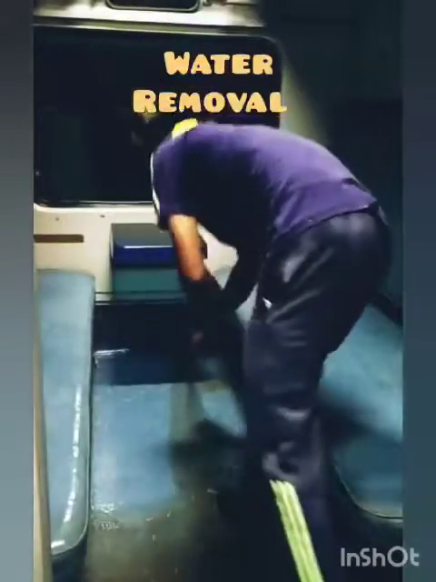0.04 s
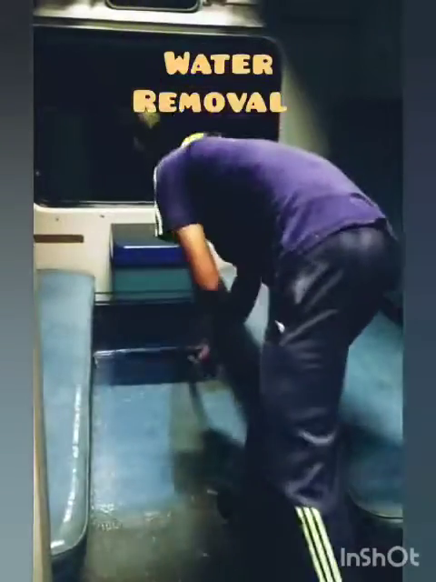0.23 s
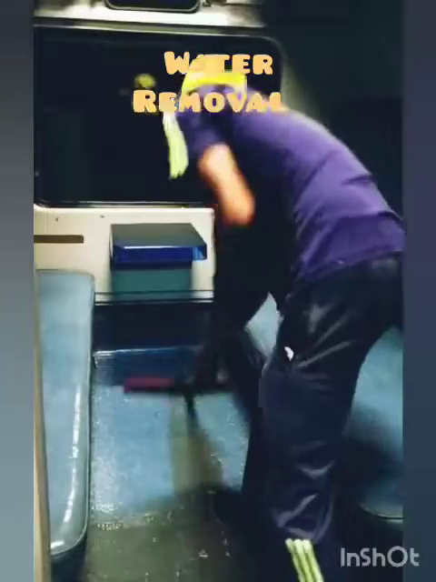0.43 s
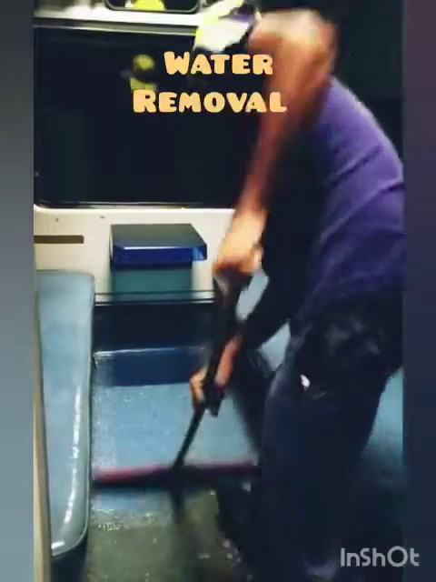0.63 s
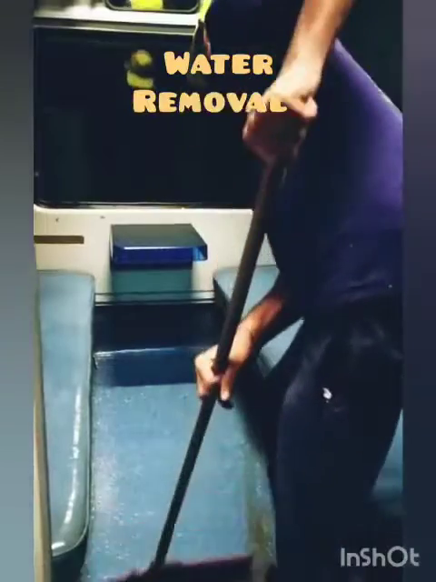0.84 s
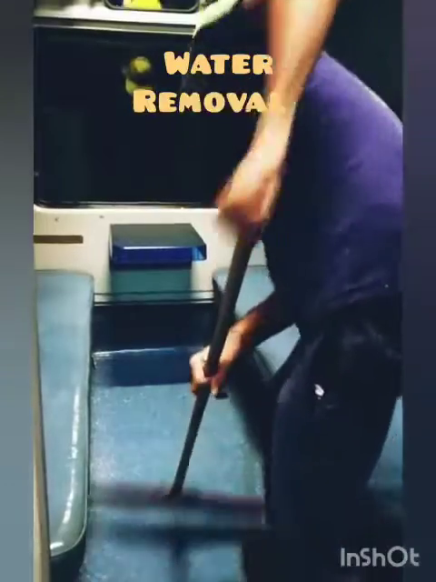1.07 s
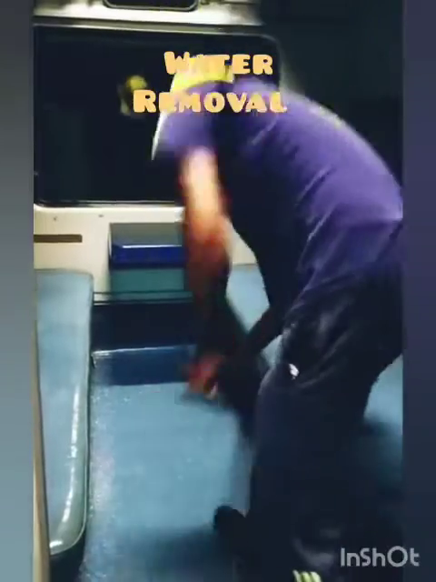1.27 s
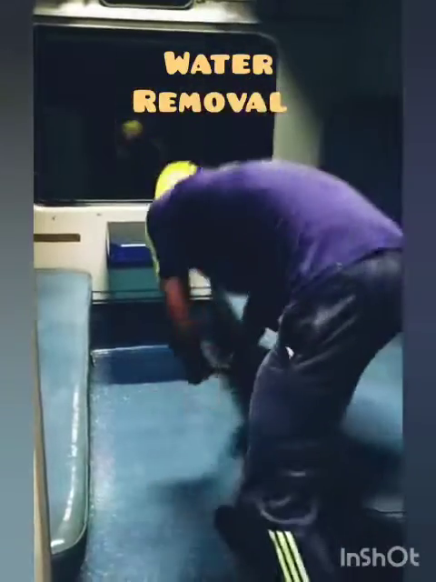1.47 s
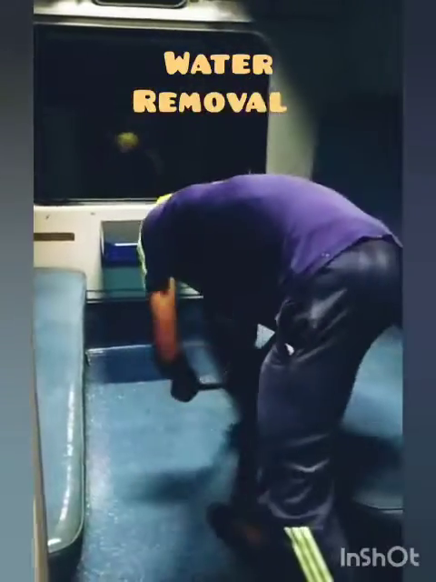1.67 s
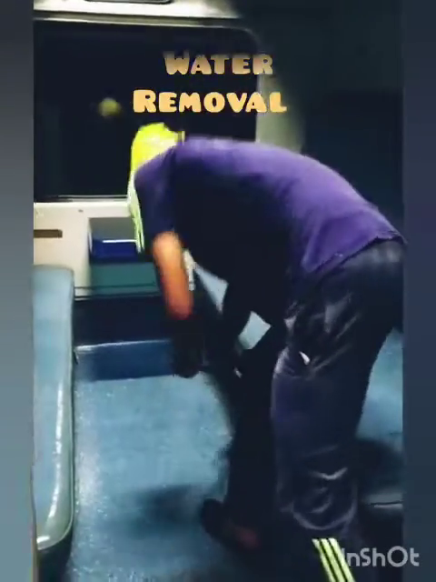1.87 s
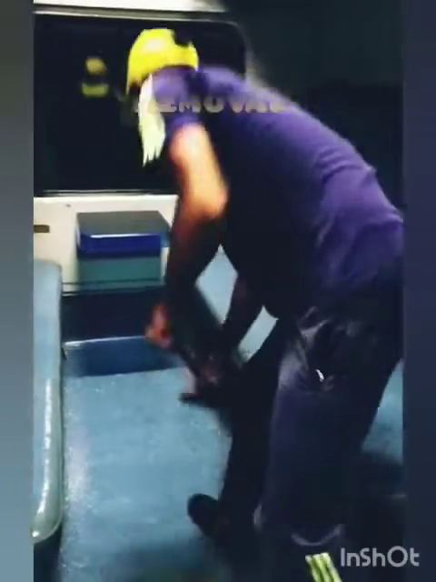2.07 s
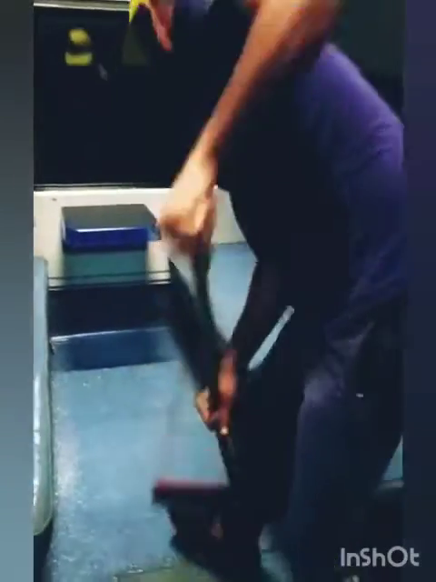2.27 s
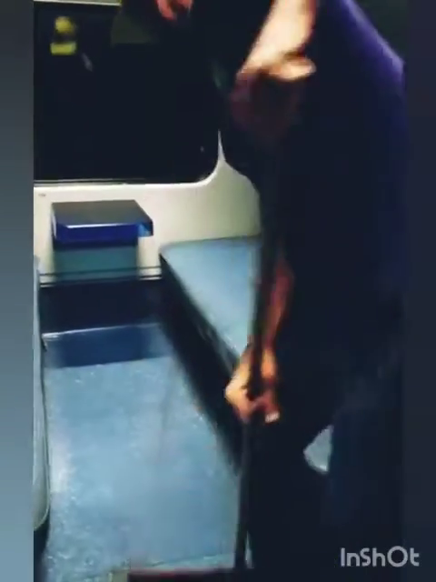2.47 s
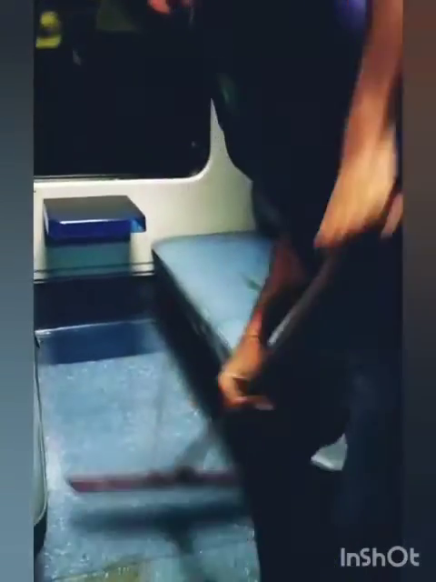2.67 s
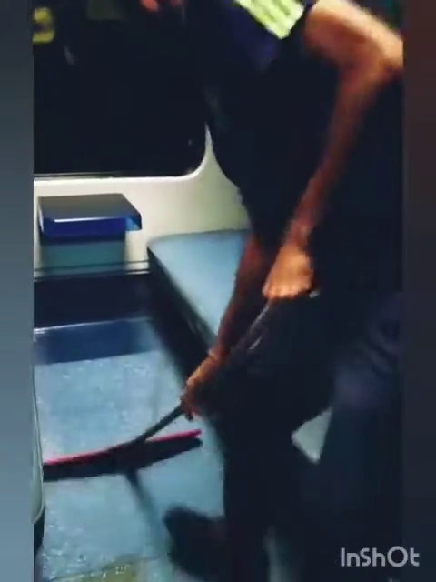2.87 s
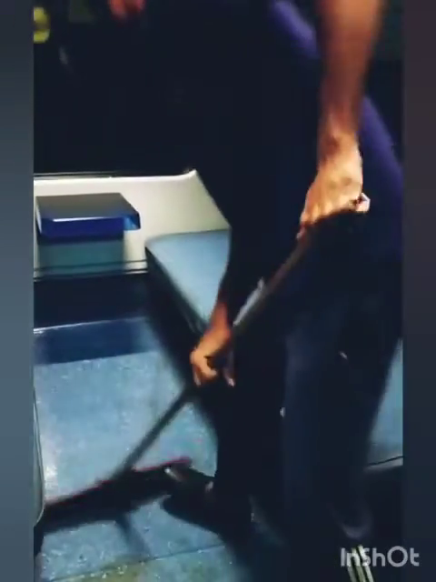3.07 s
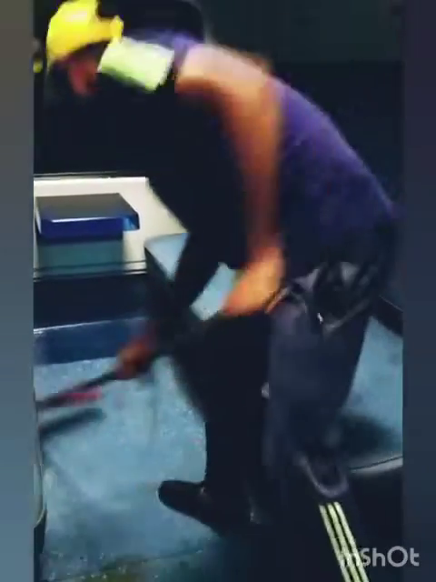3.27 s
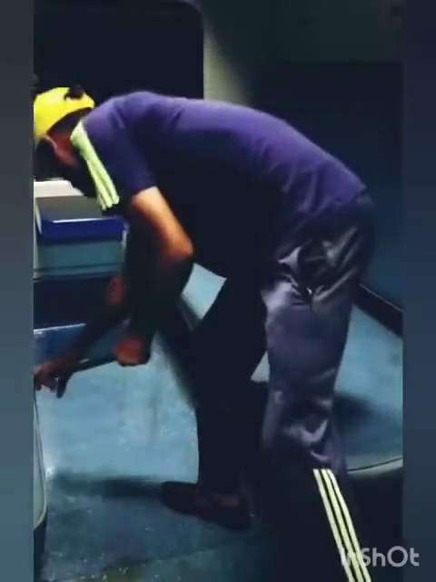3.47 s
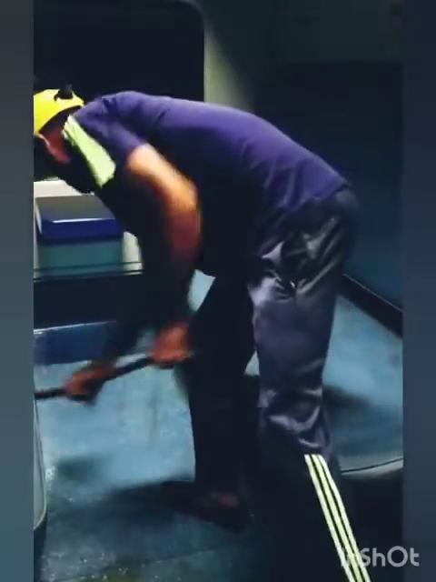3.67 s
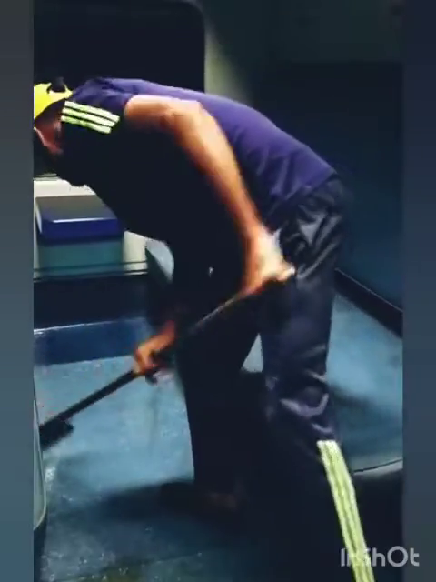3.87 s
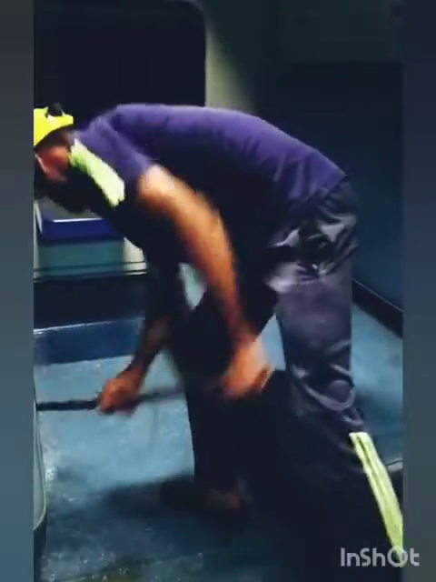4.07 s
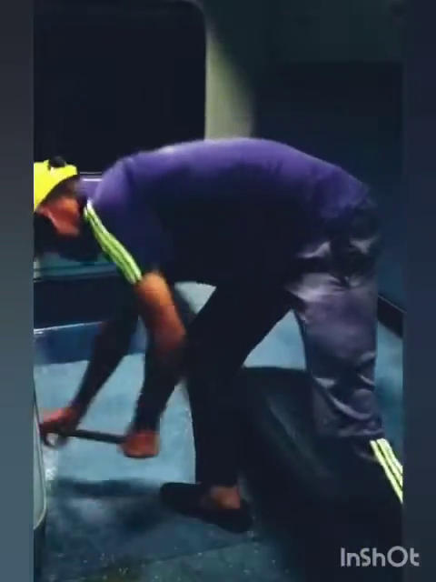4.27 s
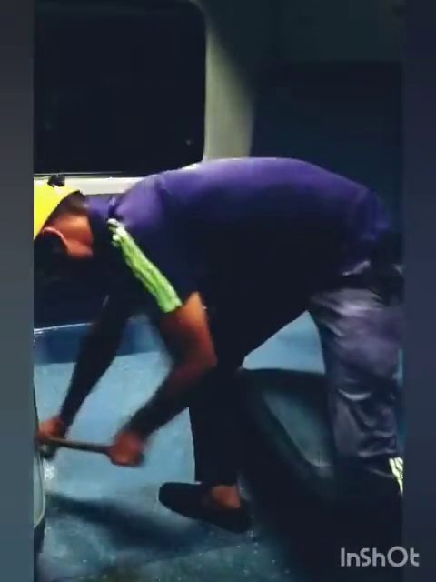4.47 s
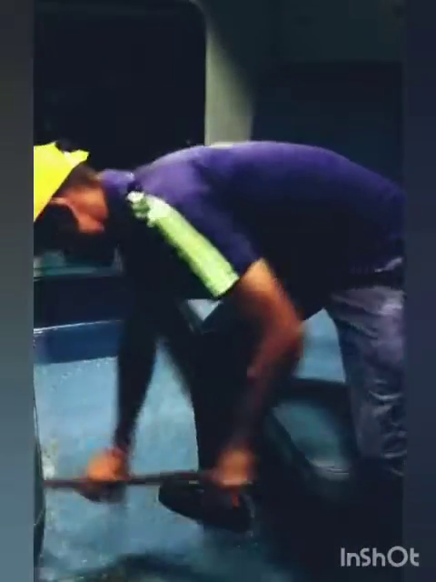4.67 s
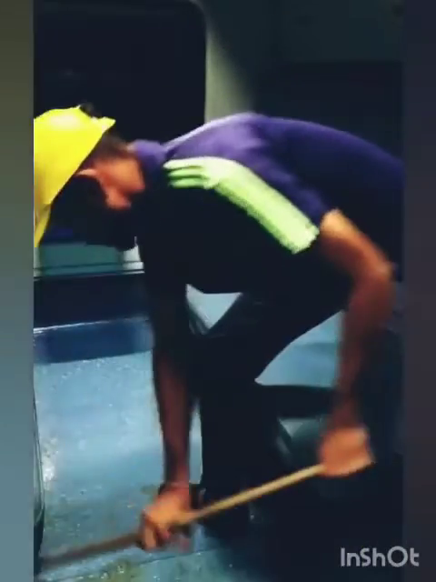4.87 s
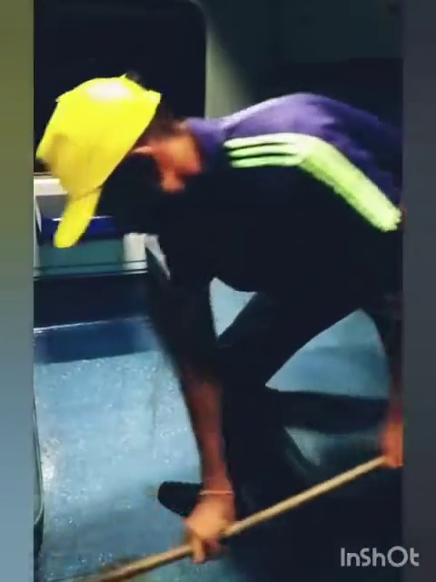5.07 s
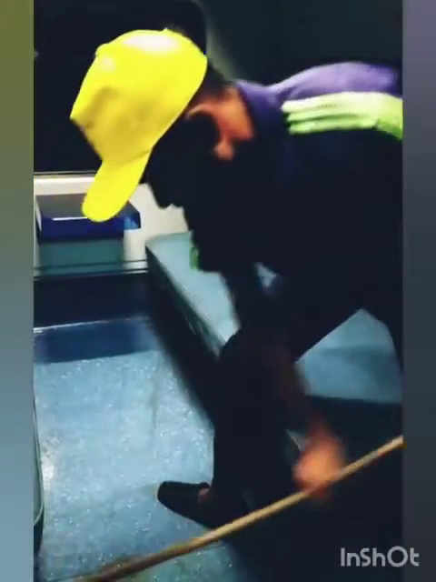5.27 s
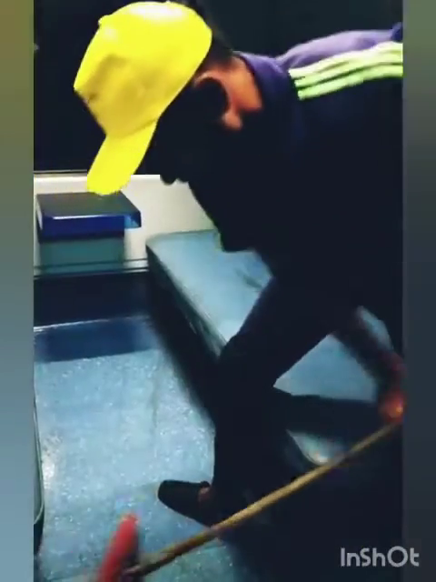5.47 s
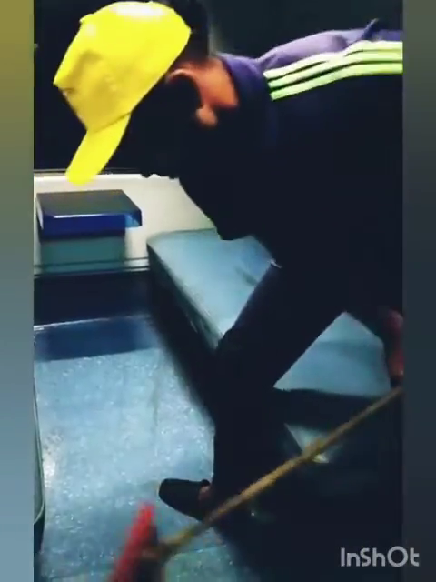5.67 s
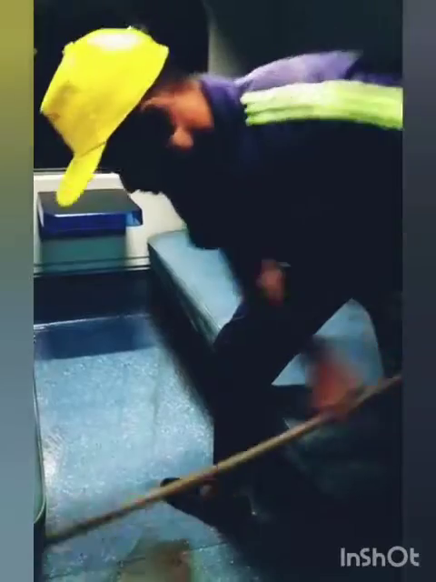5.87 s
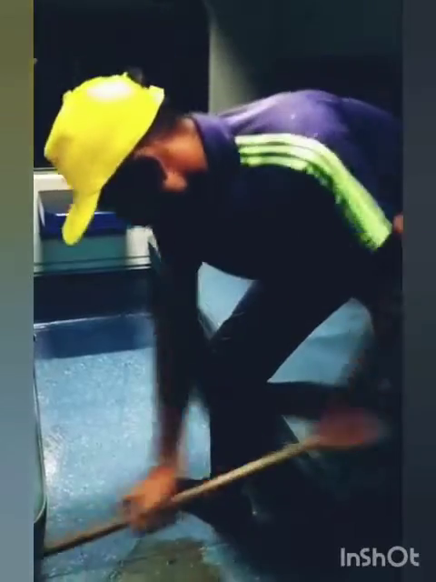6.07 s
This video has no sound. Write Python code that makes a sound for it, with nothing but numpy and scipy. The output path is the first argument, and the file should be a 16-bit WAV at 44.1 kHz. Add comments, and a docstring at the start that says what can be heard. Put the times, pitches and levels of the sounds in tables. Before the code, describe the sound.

Close, irregular wet scrubbing with stiff bristles: hard clacks, splashy landings, raspy drags and a short squeaky grab inside a small humming compartment.

```python
"""Broom on a wet coach floor

Close by, a long-handled broom is set down with a knock, a rattle and a splat, then dragged over the wet floor.
Countless random bristle slips hiss in the water film; filtered slips make the splats, judders and rattles.
Decaying modes make the knocks; one hard stroke drives narrow resonances into a squeal.
The compartment answers with a brief noise tail, over a low hum; the left microphone is shaded from the treble."""
import sys
import numpy as np
from scipy import signal
from scipy.fft import rfft, irfft
from scipy.io import wavfile
from scipy.ndimage import uniform_filter1d

SR = 44100
rng = np.random.default_rng(int(sys.argv[2]) if len(sys.argv) > 2 else 0)


def to_wav(sig):
    """Store sig (one row per channel, or 1-D mono) as 16-bit WAV at the path in sys.argv[1].

    Samples outside -1..1 are clipped; the rate is SR.
    """
    pcm = np.clip(np.atleast_2d(sig), -1, 1) * 32767
    pcm = np.round(pcm).astype(np.int16)
    wavfile.write(sys.argv[1], SR, pcm.T)  # frames by channels


N = 269451
TIME = np.arange(N) / SR

# the coach at rest, relative spectrum: [f/Hz, density/dB per Hz]
HUM_SPECTRUM = [(18, -60), (30, -33), (49, -30), (156, -13.5), (193, -2.5), (232, -0.5), (309, -9.5),
                (353, -19), (424, -7), (483, -8.5), (645, -13.5), (795, -19.5), (1600, -22), (6000, -20.5),
                (8500, -18), (13200, -21), (15800, -25)]
# broom pushes and pulls, levels before trim, rasp and fizz before their shares by pitch:
# [start t/s, length/s, attack/s, hiss level/dB, swell/dB per s, rasp level/dB, fizz level/dB]
STROKES = [(-0.1, 0.25, 0.044, -42.5, 17, -16, -33), (0.12, 0.41, 0.24, -31.5, -3, -1.5, -23),
           (0.531, 0.37, 0.13, -34, -6, 1, -6), (1.525, 0.075, 0.06, -32, 9, 8, -23),
           (1.74, 0.18, 0.071, -31.5, -0.5, -3.5, -26), (1.923, 0.13, 0.045, -34.5, 0, -5.5, -23),
           (2.014, 0.51, 0.05, -30, -14, 1, -16), (2.867, 0.28, 0.033, -39, -28, 5, -9),
           (3.206, 0.024, 0.017, -47.5, 1, 23, -12), (3.443, 0.34, 0.094, -30.5, -4, 4.5, -20),
           (4.383, 0.49, 0.23, -29, -3, -3.5, -23), (4.896, 0.063, 0.061, -33, 0, -5.5, 0),
           (4.976, 0.4, 0.22, -31.5, 7.5, 10.5, -21), (5.358, 0.13, 0.064, -29, 11, 3.5, -4)]
# bristles on the wet floor, relative spectrum: [f/Hz, density/dB per Hz]
HISS_SPECTRUM = [(71, -21), (120, -37), (150, -15), (240, -7), (301, -15.5), (640, -5.5), (802, -11),
                 (1000, -4.5), (1480, -2.5), (1900, -5.5), (2450, -3.5), (4400, -3.5), (5000, -5),
                 (5930, -2), (7200, -2), (9500, -1.5), (13600, -5.5), (15800, -11.5)]
# how far each pitch follows the rasp and the fizz: [f/Hz, share]
RASP_SHARE = [(200, 0.79), (900, 0.41), (3800, 0.53), (7000, 0.017)]
FIZZ_SHARE = [(7000, 0.006), (12000, 0.24)]
# the dragged head judders, level before trim, width of each of two filter passes:
# [start t/s, length/s, attack/s, f/Hz, width/Hz, level/dB]
JUDDERS = [(0.043, 0.018, 0.0096, 840, 450, -35), (0.492, 0.33, 0.036, 624, 332, -46.5),
           (0.872, 0.041, 0.01, 290, 253, -46), (2.01, 0.071, 0.037, 775, 450, -44),
           (2.167, 0.21, 0.03, 610, 416, -44), (2.376, 0.032, 0.008, 610, 248, -39.5),
           (3.452, 0.072, 0.036, 920, 1000, -32), (3.467, 0.046, 0.0086, 612, 110, -35.5),
           (4.703, 0.085, 0.018, 520, 221, -48.5), (4.974, 0.14, 0.026, 940, 400, -35),
           (4.99, 0.03, 0.004, 2260, 90, -35), (5.09, 0.2, 0.057, 510, 300, -45.5),
           (5.243, 0.062, 0.033, 243, 120, -43), (5.496, 0.041, 0.02, 990, 300, -34.5)]
# the judder stutters at random: (level points per s, depth/dB)
STUTTER = (38, 1.8)
# water slapped from under the head, levels before trim:
# [t/s, spray level/dB, slosh level/dB, rise/s, spray fade/s, spray's brightest f/Hz, left minus right level/dB]
SPLATS = [(0.0438, -21, -27, 0.0022, 0.015, 6400, -17), (0.058, -47, -24.5, 0.0033, 0.044, 3500, -18.5),
          (0.536, -21, -34, 0.0027, 0.013, 9000, -18), (1.198, -46.5, -51, 0.0058, 0.15, 3380, -21),
          (1.268, -23, -39.5, 0.0095, 0.04, 5800, -19), (1.464, -24, -35, 0.049, 0.023, 3800, -16),
          (1.497, -27.5, -23.5, 0.0014, 0.052, 6200, -10.5), (1.887, -25, -68, 0.0039, 0.017, 6960, -18),
          (2.843, -39, -30, 0.00044, 0.074, 6360, -21), (3.225, -24, -54, 0.0046, 0.027, 7700, -20),
          (3.405, -33.5, -43.5, 0.032, 0.058, 8700, -19), (3.463, -38, -30, 0.016, 0.062, 5160, -18),
          (4.242, -40, -46, 0.00074, 0.0045, 4000, -35), (4.266, -31, -20.5, 0.0059, 0.18, 6000, -19),
          (4.995, -19, -26, 0.0013, 0.12, 3130, -8), (5.464, -34, -35, 0.0013, 0.007, 2520, -5),
          (5.825, -32.5, -67, 0.017, 0.013, 10900, -17), (5.858, -40.5, -85, 0.0052, 0.012, 9550, -25)]
# the head or a foot meets the floor, knock and boom levels before trim:
# [t/s, knock level/dB, contact f/Hz, floor boom level/dB, rattle level/dB, left minus right level/dB]
KNOCKS = [(0.0585, -13, 740, -53, -38, -19), (0.0624, -4.5, 960, -31, -33, -19),
          (0.068, -12, 664, -24, -35, -6), (0.106, -32, 805, -48, -55, -19),
          (0.138, -22, 635, -34, -63, -15), (0.354, -23, 337, -23.5, -50, -14),
          (0.365, -18, 137, -39, -52, -10), (0.379, -27, 171, -43, -57, -6),
          (0.54, -30, 170, -43, -58, -13), (0.553, -23, 173, -49, -56, -13),
          (1.198, -23.5, 450, -26.5, -56, -16), (1.306, -23.5, 450, -25, -60, -12),
          (1.477, -23.5, 520, -35, -52, -14), (1.4997, -0.5, 1150, -13, -16.5, -10),
          (1.507, 1, 565, -10.5, -42, -6.5), (1.894, -25.5, 162, -40, -57, -10),
          (2.8463, 0, 715, -16.5, -18.5, -11), (2.8629, -9.5, 1100, -34, -32, -27),
          (2.8864, -8, 980, -43, -27, -15), (3.125, -15.5, 527, -19.5, -35.5, -16),
          (3.226, -19, 1210, -26.5, -52, -11), (3.469, -19.5, 910, -38, -35, -27),
          (3.477, -15, 610, -21, -38, -15), (4.246, -18, 450, -34, -62, -15),
          (4.2689, -2.5, 364, -23, -35, -13), (4.279, -8, 497, -21, -51, -11),
          (4.291, -12, 520, -20, -48, -6), (4.425, -25, 474, -38, -45, -15),
          (4.651, -23, 470, -45, -55, -12), (4.667, -23.5, 493, -38, -57, -12),
          (4.677, -25, 604, -47, -56, -16), (4.9963, 2, 490, -6.5, -20.5, -0.5),
          (5.021, -7.5, 1040, -28, -37, 14), (5.4643, -19, 1240, -30, -50, 1),
          (5.468, -8.5, 1270, -36, -48, -12), (5.487, -13, 850, -19.5, -42, -9),
          (5.508, -7.5, 990, -26, -46, -34), (5.520, -11.5, 457, -17, -39, -8.5)]
# struck broom head and handle, relative: [f/Hz, width/Hz, energy level/dB]
BROOM_MODES = [(460.3, 16, -9), (541, 57, -6.5), (639, 44, -6), (880, 93, -9), (1017, 38, -11),
               (1164, 120, -5), (1365, 59, -8), (2320, 66, -9)]
# hollow floor panel, relative: [f/Hz, width/Hz, energy level/dB]
PANEL_MODES = [(170, 22, -5), (226.4, 17, 7.5), (262, 83, 4)]
# the hard-pressed edge grabs the floor: [start t/s, length/s, attack/s, squeal level/dB, whistle level/dB]
GRABS = [(3.513, 0.03, 0.02, -28.5, -31), (3.56, 0.035, 0.022, -29.5, -33), (3.622, 0.028, 0.008, -23, -37),
         (3.665, 0.075, 0.015, -27.5, -35.5), (3.76, 0.045, 0.022, -30, -41)]
# resonances of the squealing edge: [f/Hz, width of each of two filter passes/Hz, relative level/dB]
SQUEAL_MODES = [(1480, 300, -12), (2720, 110, -10), (3780, 200, -18), (4482, 32, -11), (4620, 30, -12),
                (6400, 1000, -2), (6447, 35, -16), (6587, 55, -8.5), (7000, 700, -3), (7600, 1300, 1)]
# thin whistle on top of the squeal: [f/Hz, width of each of two filter passes/Hz, relative level/dB]
WHISTLE_MODES = [(12135, 130, -7), (12565, 70, -7)]
# reverberation of the compartment: [f/Hz, t60/s]
COACH_T60 = [(200, 0.28), (500, 0.27), (1200, 0.37), (4000, 0.57), (12000, 0.5)]
# share of a left-right level difference that each pitch gets: [f/Hz, share]
SHADE = [(200, 0.74), (600, 0.7), (1400, 0.64), (2800, 0.81), (5500, 0.94), (9000, 1.26), (14000, 0.93)]

# hiss, squeal and judder die away at these rates once the push, grab or spell ends
RELEASE_DB_PER_S, GRAB_RELEASE_DB_PER_S, JUDDER_RELEASE_DB_PER_S = 114.5, 253, 269
# a stroke wipes the water film thinner: the rasp fades and the fizz grows (before their shares by pitch)
RASP_DB_PER_S, FIZZ_DB_PER_S = -11.5, 39
# spreads of two random level changes of the hiss over pitch and time
RIPPLE_DB, GRAIN_DB = 2.0, 1.6
# under the spray the body of the water sloshes, lower and always alike
SLOSH_HZ, SLOSH_FADE_S = 1820, 0.051
RATTLE_RISE_S, RATTLE_FADE_S = 0.017, 0.024
TOP_HZ = 15900


def undb(db):
    """Turn dB into an amplitude factor."""
    return 10 ** (np.asarray(db) / 20)


def unit(x):
    """Scale to rms 1."""
    return x / np.sqrt(np.mean(x ** 2))


def at(points, hz):
    """Read (Hz, value) points on a log-frequency axis."""
    f, value = np.transpose(points)
    return np.interp(np.log(np.maximum(hz, 1)), np.log(f), value)


def colour(x, points):
    """Weight the spectrum of a sound by (Hz, dB) points."""
    f = np.fft.rfftfreq(x.shape[-1], 1 / SR)
    return irfft(rfft(x) * undb(at(points, f)), x.shape[-1])


def bands(x, count=17):
    """Yield (Hz, band) for overlapping half-octave bands that sum to the sound."""
    centres = np.geomspace(60, 15000, count)
    spectrum, f = rfft(x), np.fft.rfftfreq(x.shape[-1], 1 / SR)
    for hz, weights in zip(centres, np.eye(count)):
        share = at(np.c_[centres, weights], f)
        yield hz, irfft(spectrum * share, x.shape[-1])


def resonate(x, hz, width):
    """Two-pole resonance with gain 1 at its centre."""
    w = 2 * np.pi * min(hz, SR / 2.2) / SR
    a = np.sin(w) * width / hz / 2
    return signal.lfilter([a, 0, -a], [1 + a, -2 * np.cos(w), 1 - a], x)


def resonate_twice(x, hz, width):
    """Two equal resonances in a row, for steeper skirts, at rms 1."""
    once = resonate(x, hz, width)
    return unit(resonate(once, hz, width))


def ring(modes, t):
    """Sum struck modes; a wider mode dies sooner, and its dB is its energy."""
    total = 0
    for hz, width, db in modes:
        decay = np.exp(-np.pi * width * t)
        total = total + undb(db) * np.sqrt(width / SR) * decay * np.sin(2 * np.pi * hz * t)
    return total


def walk(rate):
    """Random level curve with a spread near 1, given its points per second."""
    points = rng.standard_normal(400)
    return np.interp(TIME * rate % 399, np.arange(400), points)


def patches(shape, size):
    """Smooth chance over pitch and time with a spread of 1."""
    over_pitch = uniform_filter1d(rng.standard_normal(shape), size[0], axis=-2)
    return unit(uniform_filter1d(over_pitch, size[1], axis=-1))


def pan(db):
    """Left and right gains of constant power for a left minus right level."""
    ratio = undb(np.atleast_1d(db))
    return np.array([ratio, np.ones_like(ratio)]) * 2 / np.sqrt(1 + ratio ** 2)


def place(x, side_db):
    """The left microphone is shaded more in the treble than in the bass."""
    f = np.fft.rfftfreq(x.shape[-1], 1 / SR)
    return irfft(rfft(x) * pan(side_db * at(SHADE, f)), x.shape[-1])


def blend(pair, alike_hz):
    """Long waves reach both microphones alike."""
    lowpass = signal.butter(1, alike_hz, fs=SR, output="sos")
    shared = signal.sosfilt(lowpass, pair[1] - pair[0])
    return np.array([pair[0] + shared, pair[1]])


def slips(rate, spread_db):
    """Dense tiny clicks of very uneven size, one stream for each microphone."""
    fired = rng.random((2, N)) < rate / SR
    size = undb(spread_db * np.minimum(rng.exponential(size=(2, N)), 5))
    return unit(fired * size * rng.standard_normal((2, N)))


def effort(t, start, length, attack, release_db_per_s):
    """The arm leans in, holds until the stroke ends, then lets go."""
    lean = np.clip((t - start) / attack, 0, 1)
    return lean * undb(-release_db_per_s * np.maximum(t - start - length, 0))


def hum(level_db=-53.5, side_db=-14):
    """The coach drones low and steady under a faint hiss: coloured noise."""
    noise = blend(rng.standard_normal((2, N)), alike_hz=680)
    return place(unit(colour(noise, HUM_SPECTRUM)), side_db) * undb(level_db)


def scrubbing(gain_db=-0.5, side_db=-20):
    """Bristle slips hiss as the head is dragged; a hard grip rasps in the middle range, a thin water film fizzes."""
    friction = blend(slips(rate=34000, spread_db=1.0), alike_hz=570)
    f, t, frames = signal.stft(unit(colour(friction, HISS_SPECTRUM)), SR, nperseg=512)
    rasp_share, fizz_share = at(RASP_SHARE, f), at(FIZZ_SHARE, f)
    power = 0
    for start, length, attack, db, swell, rasp_db, fizz_db in STROKES:
        age = np.clip(t - start, 0, length)
        rasp = np.outer(rasp_share, rasp_db + RASP_DB_PER_S * age)
        fizz = np.outer(fizz_share, fizz_db + FIZZ_DB_PER_S * age)
        push = effort(t, start, length, attack, RELEASE_DB_PER_S)
        power = power + (push * undb(db + swell * age + rasp + fizz)) ** 2
    # small random level changes over pitch and time make the hiss uneven
    ripple = RIPPLE_DB * patches(frames.shape, size=(1, 9))
    # quick random level flutter over broad ranges of pitch roughens the hiss
    grain = GRAIN_DB * patches(frames.shape, size=(30, 1))
    shaped = frames * np.sqrt(power) * undb(ripple + grain + gain_db)
    hiss = signal.istft(shaped, SR)[1][:, :N]
    return place(hiss, side_db)


def judders(side_db=-6, gain_db=-1):
    """The dragged head catches and moans in short, stuttering spells: slips through a resonance."""
    drive = blend(slips(rate=2500, spread_db=1.0), alike_hz=660)
    out = 0
    for start, length, attack, hz, width, db in JUDDERS:
        chatter = resonate_twice(drive, hz, width)
        spell = effort(TIME, start, length, attack, JUDDER_RELEASE_DB_PER_S)
        out = out + chatter * undb(db + gain_db) * spell
    stutter_rate, stutter_db = STUTTER
    return out * undb(stutter_db * walk(stutter_rate)) * pan(side_db)


def splats(gain_db=-4):
    """Each landing throws a burst of fine spray over a duller slosh."""
    spray = blend(slips(rate=18000, spread_db=1.5), alike_hz=607)
    out = np.zeros((2, N))
    for s, spray_db, slosh_db, rise, spray_fade, spray_hz, side_db in SPLATS:
        start = int(s * SR)
        layers = (spray_db, spray_hz, spray_fade), (slosh_db, SLOSH_HZ, SLOSH_FADE_S)
        for db, hz, fade in layers:
            # as wide as its own pitch
            drops = unit(resonate(spray[:, start:start + 2 ** 15], hz, width=hz))
            age = TIME[:drops.shape[1]]
            burst = (1 - np.exp(-age / rise)) * np.exp(-age / fade)
            out[:, start:start + len(age)] += place(drops, side_db) * burst * undb(db + gain_db)
    return out


def knocks(gain_db=20, damping=0.15, broom_db=2, crack_db=-30, cushion_s=0.00043, lowest_hz=175):
    """A blow is a short dull push, cushioned by the bristles; it rings the broom and the floor panel."""
    t = np.arange(SR // 2) / SR
    out = np.zeros((2, N + len(t)))
    broom, panel = ring(BROOM_MODES, t), ring(PANEL_MODES, t)
    cushion = 1 - np.exp(-t / cushion_s)
    for s, db, hz, boom_db, _, side_db in KNOCKS:
        push = ring([(hz, damping * hz, 0)], t)
        # the crack grows faster than the blow, so it favours hard blows
        crack = undb(crack_db + db / 2) * rng.standard_normal((2, len(t))) * np.exp(-t / 0.001)
        # the broom answers mostly near the contact pitch
        answer = undb(broom_db) * resonate(broom, hz, 0.87 * hz)
        blow = undb(db) * (push + crack + answer) + undb(boom_db) * panel
        start = int(s * SR)
        out[:, start:start + len(t)] += undb(gain_db) * blow * cushion * pan(side_db) / 2
    # such small surfaces radiate little bass
    highpass = signal.butter(2, lowest_hz, "highpass", fs=SR, output="sos")
    return signal.sosfilt(highpass, out[:, :N])


def rattles(breadth=0.79, side_db=-7):
    """Each blow shakes the loose head, which rattles briefly near the contact pitch."""
    drive = blend(slips(rate=1500, spread_db=1.5), alike_hz=700)
    out = np.zeros((2, N))
    for s, _, hz, _, db, _ in KNOCKS:
        start = int(s * SR)
        chatter = resonate_twice(drive[:, start:start + SR // 2], hz, breadth * hz)
        age = TIME[:chatter.shape[1]]
        shake = (1 - np.exp(-age / RATTLE_RISE_S)) * np.exp(-age / RATTLE_FADE_S)
        out[:, start:start + len(age)] += chatter * undb(db) * shake
    return out * pan(side_db)


def squeal(side_db=-20):
    """Pressed hard, the wet edge grabs several times; it sticks and slips at a few resonances and whistles on top."""
    drive = slips(rate=33000, spread_db=1.0)

    def voice(modes):
        """Resonances driven by the slips, each wavering in level."""
        total = 0
        for hz, width, db in modes:
            total = total + resonate_twice(drive, hz, width) * undb(db + 1.3 * walk(rate=16))
        return unit(total)

    body, whistle = 0, 0
    for start, length, attack, db, whistle_db in GRABS:
        grip = effort(TIME, start, length, attack, GRAB_RELEASE_DB_PER_S)
        # overlapping grabs add in power
        body = np.hypot(body, undb(db) * grip)
        whistle = np.hypot(whistle, undb(whistle_db) * grip)
    return (body * voice(SQUEAL_MODES) + whistle * voice(WHISTLE_MODES)) * pan(side_db)


def compartment(x, wet_db, build_s=0.0012):
    """Close walls and seats return a dense, short echo: noise that decays at its own rate in each band."""
    t = np.arange(SR * 2 // 3) / SR
    noise = blend(rng.standard_normal((2, len(t))), alike_hz=298)
    tail = 0
    for hz, band in bands(noise):
        tail = tail + band * np.exp(-np.log(1000) * t / at(COACH_T60, hz))
    tail = unit(tail * (1 - np.exp(-t / build_s))) / np.sqrt(len(t))
    return x + undb(wet_db) * signal.fftconvolve(x, tail, axes=1)[:, :N]


def scene():
    """Wet friction and knocks in the compartment, over its hum."""
    wet_floor = scrubbing() + judders() + splats() + rattles() + squeal()
    return hum() + compartment(wet_floor, wet_db=-5.5) + compartment(knocks(), wet_db=0.5)


def record(dry):
    """The phone thins the bass, rounds the highest peaks and cuts the top."""
    thin = signal.sosfilt(signal.butter(2, 90, "highpass", fs=SR, output="sos"), dry)
    top_cut = signal.ellip(10, .2, 80, TOP_HZ, fs=SR, output="sos")
    return signal.sosfilt(top_cut, np.tanh(thin))


dry = scene()
out = record(dry)
to_wav(out)
```